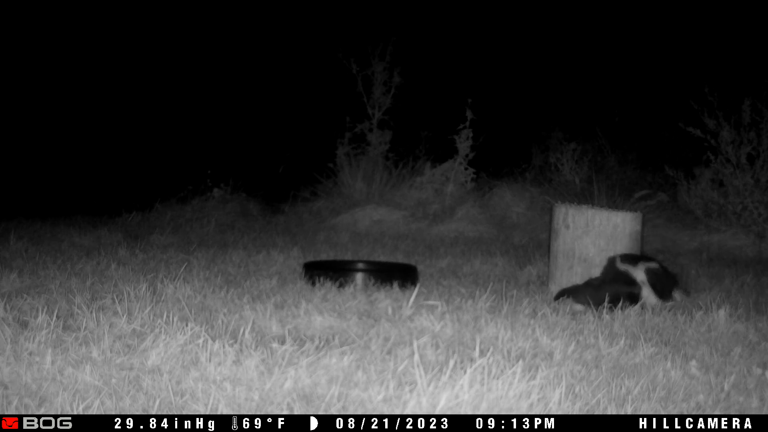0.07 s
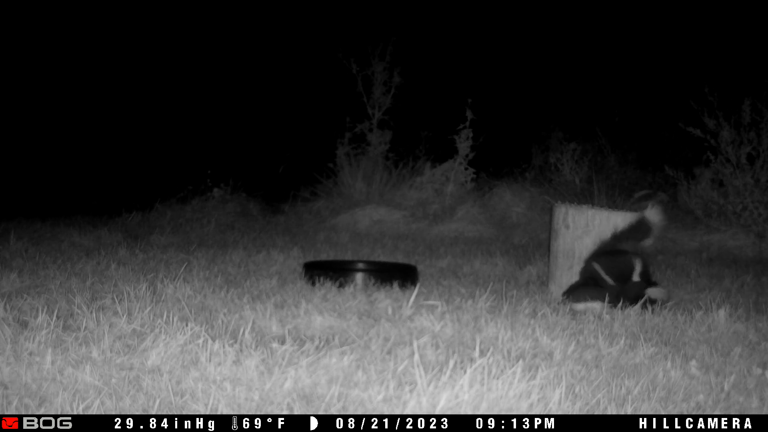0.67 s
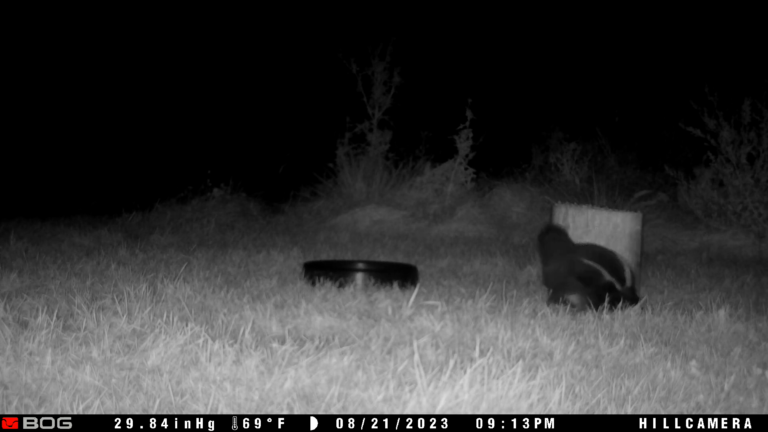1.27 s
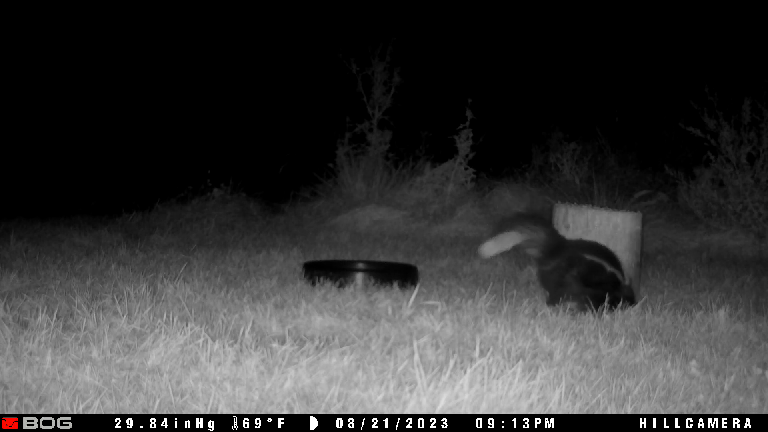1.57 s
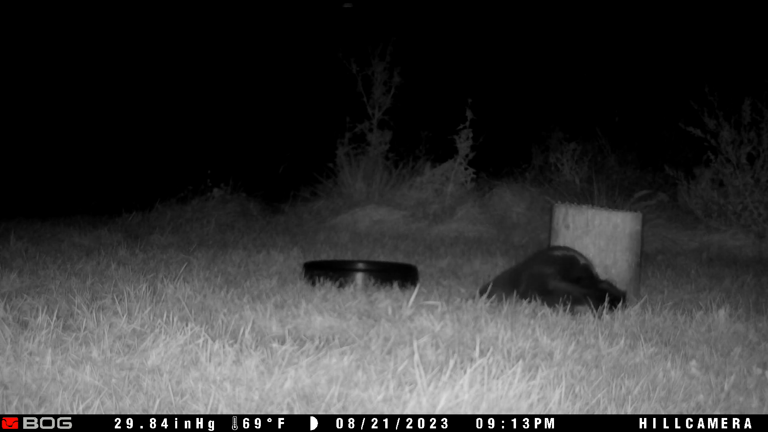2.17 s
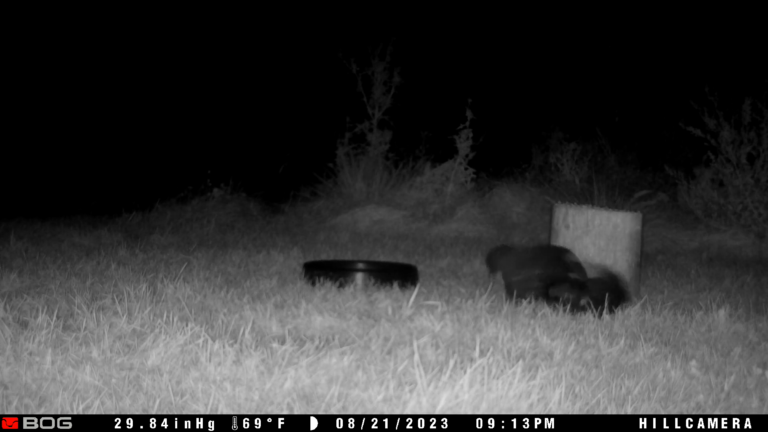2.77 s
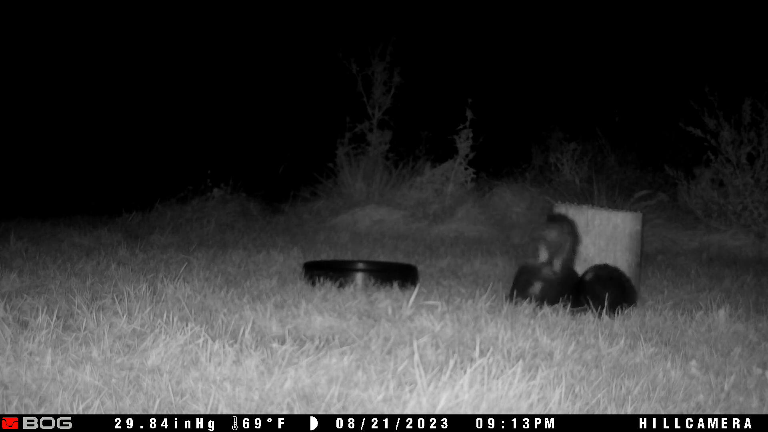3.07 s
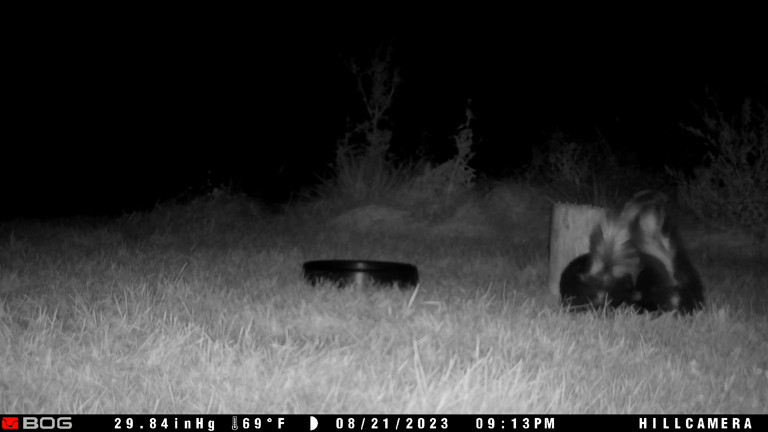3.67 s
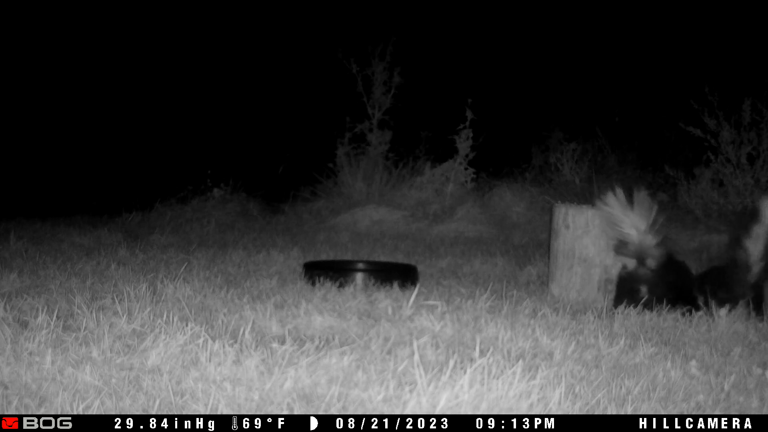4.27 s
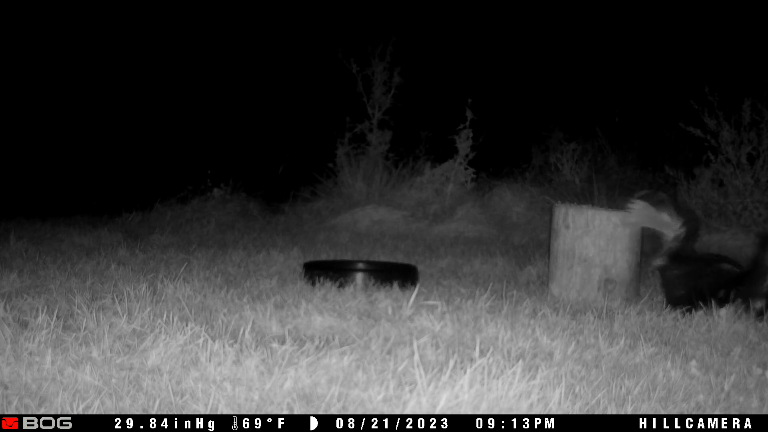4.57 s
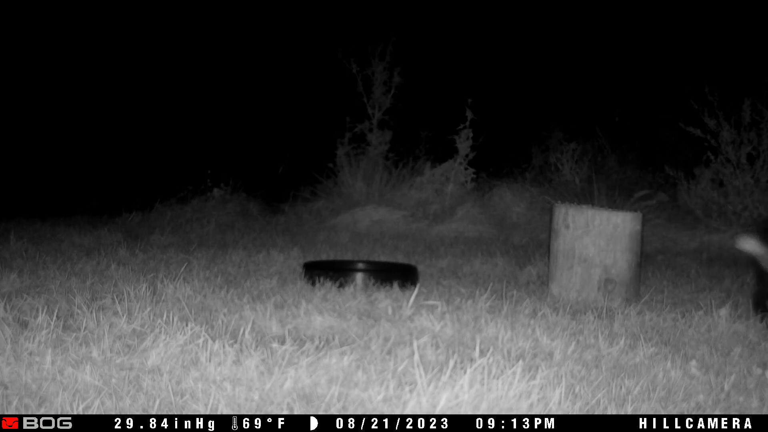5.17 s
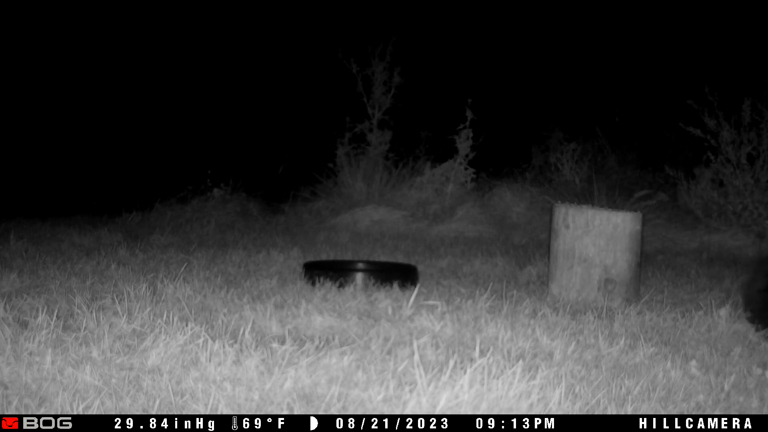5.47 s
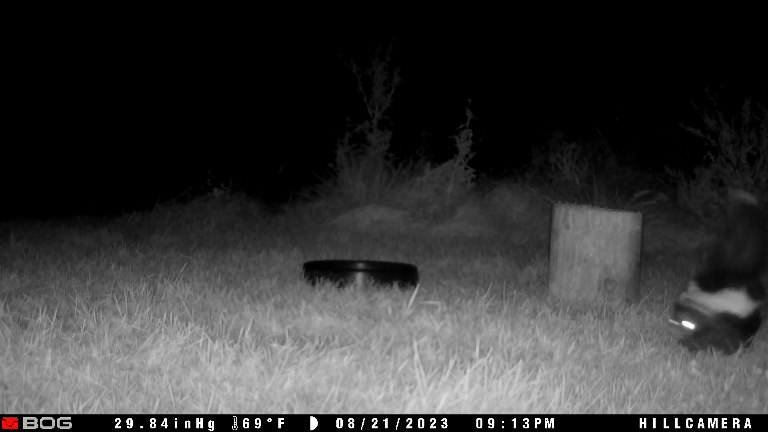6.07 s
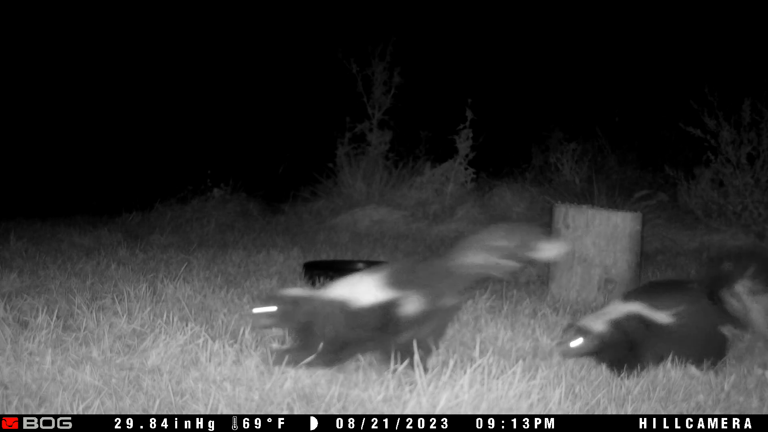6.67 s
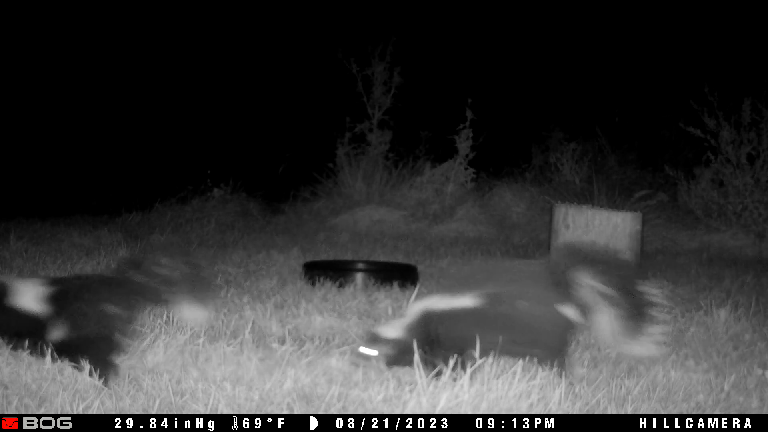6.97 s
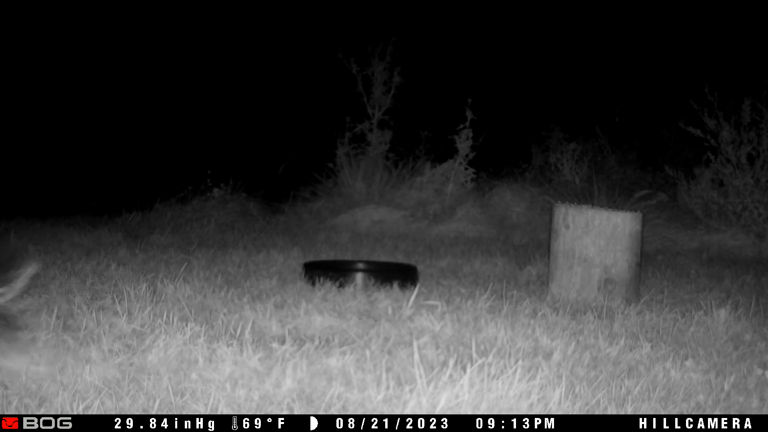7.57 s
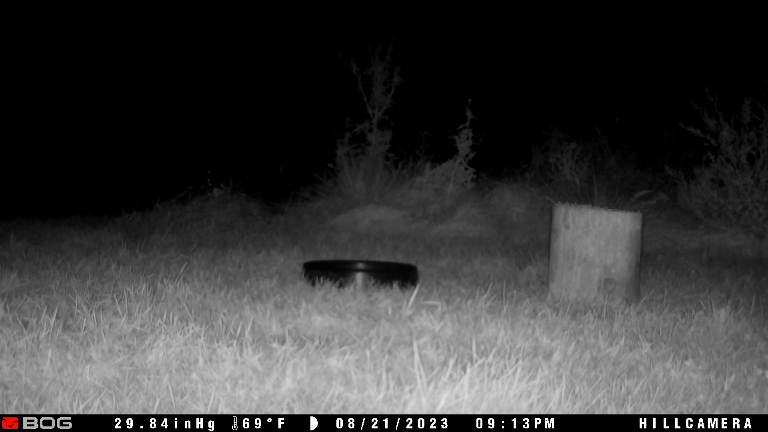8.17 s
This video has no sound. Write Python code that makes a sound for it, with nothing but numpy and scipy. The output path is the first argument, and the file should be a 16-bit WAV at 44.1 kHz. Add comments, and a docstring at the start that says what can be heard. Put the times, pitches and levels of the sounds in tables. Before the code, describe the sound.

High, harsh screeches of fighting skunks crackle a close microphone while night insects chirr, ending with a short scamper through grass.

```python
"""A lawn at night, where two skunks fight a few metres from a small microphone.
One screeches again and again: its tight vocal folds make a high, unsteady whistle with a strong
octave, which keeps breaking into rasp and makes the microphone crackle. Crickets trill all round,
two katydids scrape their wings out of step, and at last the skunks run off through the grass."""
import sys
import numpy as np
from scipy import signal
from scipy.fft import rfft, irfft, next_fast_len
from scipy.io import wavfile
from scipy.ndimage import uniform_filter1d

SR = 44100
rng = np.random.default_rng(int(sys.argv[2]) if len(sys.argv) > 2 else 0)


def store_pcm(level_fs):
    """Save levels as 16-bit WAV."""
    pcm = np.round(np.clip(level_fs, -1, 1) * 32767).astype(np.int16)
    wavfile.write(sys.argv[1], SR, np.atleast_2d(pcm).T)


N = 371322
TIME = np.arange(N) / SR

# tone of the still night air: frequency_hz, gain_db
AIR_EQ = [(25, -20), (100, -16.5), (220, -10), (350, -4), (560, -4.5), (950, 3.5), (1700, -2.5), (2600, 0),
          (3700, -11), (5350, -8), (5900, -23.5), (7400, -38), (12500, -45), (15700, -33)]
# cricket choruses: pitch_hz, spread_hz, pulses_per_s, level_db
CRICKET_CHORUSES = [(2136, 77, 36, -43.5), (2417, 49, 65, -58.5), (2970, 100, 77, -52)]
# strokes at which each katydid shifts its tempo: time_s
HIGH_KATYDID_CUES = [.06, 1.775, 2.41, 3.497, 3.64, 4.667, 6.032, 6.76, 6.906, 7.631, 7.779, 8.51]
LOW_KATYDID_CUES = [.03, 0.364, .953, 1.757, 2.637, 3.844, 4.532, 5.521, 5.994, 7.557, 8.445]
# tone of a wing scrape: frequency_hz, gain_db
WING_EQ = [(7000, -45), (9000, -6), (10500, 2.5), (12200, 9), (13500, 4.5), (15500, 2), (17000, -30)]
# bodies brushing through the grass: start_s, end_s, level_db
SCUFFLES = [(2.6, 2.7, -45.5), (3.42, 3.56, -48), (5.52, 5.62, -43.5), (5.92, 6.08, -48.5)]
# paws snapping stems: start_s, relative_level_db
PAW_STEPS = [(6.418, -36), (6.4726, -37), (6.6456, -36), (6.6647, -30), (6.9631, -41), (7.0994, -47),
             (7.1194, -43), (7.152, -42)]
# tone of the grass: frequency_hz, gain_db
GRASS_EQ = [(60, -32), (500, 7), (2000, 0), (4300, 10.5), (6000, -15), (9000, -39), (15000, -28)]
# echoes from the bushes and the ground: delay_s, gain_db
ECHOES = [(.0043, -70), (0.012, -17), (.029, -52), (.047, -22)]
# tone of the microphone's pops: frequency_hz, gain_db
CRACKLE_EQ = [(20, -0.5), (100, -0.5), (400, 1), (1200, 0), (3000, 0), (5000, -42), (7500, -25),
              (10000, -24), (14000, -13), (16000, -26)]
# air hissing past the teeth: frequency_hz, gain_db
TEETH_EQ = [(4000, -4), (6200, 8), (7200, 5.5), (9000, -1.5), (11500, -2), (15500, -33)]
# broad part of the rasp: frequency_hz, gain_db
THROAT_EQ = [(200, -17), (600, -3), (1500, -5), (2100, -3.5), (3000, 11), (4500, 13.5), (5500, 0),
             (6300, -36.5), (7300, -41), (9000, -12), (11500, -24.5), (15500, -70)]
# share of the harshest rasp that rings in the mouth: pitch_hz, share_0_to_1
MOUTH_SHARE = [(1300, .92), (1700, 0.7), (2200, 0.45), (2450, 0.29), (2850, 0.36)]
# sidebands from the growl, a slower vibration in the voice: offset_in_growl_rates, gain_db
OCTAVE_SIDEBANDS = [(-2, -39.5), (-1, -1.5), (1, -15.5)]
FUNDAMENTAL_SIDEBANDS = [(-1, -18), (1, -7.5)]
# faint high overtones: pitch_multiple, gain_db
OVERTONES = [(3, -34.5), (4, -42), (5, -48)]
# one curve per screech at full voice, from high arching squeals through hoarse cries to a falling
# shriek: time_s, pitch_hz, level_db, octave_over_fundamental_db, roughness_0_to_1
SCREECHES = [
    [(0, 2790, -29.5, -2, 0.6), (.06, 2990, -26, -12, 0.42), (.11, 2890, -30, 4, 0.82),
     (.145, 2892, -24, 1, 0.96), (.2, 2826, -24, -12, 0.42), (.265, 2710, -32, -8, 0.51),
     (.295, 2534, -26, -14, 0.74), (.34, 2485, -24, -2, .95), (.375, 2613, -29.5, -16, 0.41),
     (.42, 2672, -20, -24, 0.02), (.46, 2464, -28, -1, 0.44), (.49, 2310, -26.5, 8, 0.98),
     (.512, 1964, -39, 0, 0.69)],
    [(.55, 2143, -36.5, 14, 0.36), (.575, 2444, -26, -6, 0.41), (.62, 2640, -30.5, -4, 0.96),
     (.655, 2756, -30.5, -6, 0.42), (.73, 2830, -27.5, -56, 0.37), (.85, 2460, -30.5, 10, 0.77),
     (.94, 2312, -31, -18, 0.54), (.998, 1892, -30, 3, 0.6)],
    [(1.246, 2240, -26.5, 0, 0.48), (1.29, 2573, -26, -5, 0.73), (1.325, 2430, -32.5, -6, 0.55),
     (1.385, 2457, -27.5, -30, 0.33)],
    [(1.428, 2370, -26, -21, 0.16), (1.45, 2404, -24, -23, 0.1), (1.5, 2502, -30, -10, 0.34),
     (1.56, 2410, -31, -1, 0.62), (1.63, 2560, -29.5, -12, 0.41), (1.69, 2494, -24, -19, 0.43),
     (1.75, 2284, -27, 1, 0.2), (1.795, 2383, -25, 6, 0.17), (1.815, 2374, -26, 3, .62),
     (1.85, 2283, -27.5, 5, .65), (1.89, 2536, -27, -7.5, 0.44), (1.945, 2342, -24.5, 10.5, 0.52),
     (1.99, 2466, -27, 0, 0.92), (2.035, 2695, -32, -3, 0.52), (2.225, 2363, -41, 4, 0.74)],
    [(2.258, 2215, -39.5, -2, 0.64), (2.39, 2362, -29.7, 9.5, 0.77), (2.46, 2455, -31.5, -6, 0.68),
     (2.52, 2314, -27.5, 9, 0.81), (2.56, 2280, -31.5, 6, 0.56), (2.585, 2244, -22.5, 9.5, .4)],
    [(2.852, 1745, -27.5, 10, 0.87), (2.9, 1860, -26.5, 21, 0.55), (2.95, 2162, -28, 11, 0.85),
     (3.08, 2116, -27.5, -2, 0.63), (3.14, 2155, -27.3, 11, 0.73), (3.25, 1701, -29.5, 6, 0.77),
     (3.3, 1830, -30, 5, 0.68), (3.38, 1628, -30.6, 9, 0.83), (3.44, 1255, -44.5, -16, 0.87)],
    [(3.848, 1856, -28.5, 7, 0.79), (3.885, 2286, -24.5, 6, .85), (3.93, 1957, -24.5, 13, 0.74),
     (4.05, 2004, -28, 4, 0.67), (4.19, 2017, -31.5, 0.5, 0.61), (4.275, 2270, -31.6, 2.5, 0.8),
     (4.33, 2104, -31, 6, 0.9), (4.42, 2200, -28.5, 0, 0.61)],
    [(4.463, 2144, -27.5, 2, 0.81), (4.53, 2213, -22.8, 1.5, 0.62), (4.59, 2236, -30, 0, 0.7),
     (4.66, 2238, -27, 5, 0.55), (4.775, 2130, -28, 2, 0.48), (4.81, 2098, -22, 6, .55),
     (4.84, 2300, -24, 2, 0.84), (4.885, 2608, -21.5, -5, 0.86), (4.93, 2393, -25, 6.5, 0.9),
     (4.99, 2287, -22, 24, 0.56), (5.04, 2130, -18.5, 14, 0.63), (5.09, 2397, -22, 4, 0.7),
     (5.2, 2300, -19, 17.5, 0.63), (5.27, 1935, -16, 17, 0.85), (5.312, 1660, -20, -2, 0.94)],
    [(5.65, 2560, -18.5, -13, 0.96), (5.685, 2175, -18, 17, .35), (5.72, 2257, -21.5, 15, 0.48),
     (5.755, 2158, -20.5, 23, 0.76), (5.765, 1942, -19.5, 13, 0.83), (5.8, 1785, -15, 11.5, 0.45),
     (5.85, 1593, -14.5, 14, 0.59), (5.875, 1276, -24, 3, 0.97), (5.9, 1204, -38.5, -8, 0.9)],
]

ATTACK_S, RELEASE_S, SAG = .034, .028, .42   # SAG: share of the pitch lost as the breath fails
TREMOR_HZ, TREMOR_SHARE, TREMOR_DB = 70.1, .022, 1.5   # rough shake: rate, pitch swing, rasp swing
GROWL_HZ, GROWL_RISE = 497, 2.3   # rate at a pitch of 2200 Hz; power of the pitch by which it quickens
FRAY_POWER = 2.45   # the partials stay clean until the voice is quite rough
THROAT_PEAK_HZ, MOUTH_HZ, MOUTH_WIDTH_HZ = 4410, 3450, 880   # resonances of the rasp


def from_db(db):
    """Decibels to gain."""
    return 10 ** (np.asarray(db) / 20)


def rms_one(x):
    """Scale to an rms of 1."""
    return x / np.sqrt(np.mean(x ** 2) + 1e-20)


def filtered(x, order, hz, kind="low"):
    """Low-, high- or band-pass filter."""
    return signal.sosfilt(signal.butter(order, hz, kind, fs=SR, output="sos"), x)


def equalise(x, eq):
    """Shape the tone with a (Hz, dB) curve."""
    hz, db = np.transpose(eq)
    size = next_fast_len(N + 4096)
    bins = np.maximum(np.arange(size // 2 + 1) * SR / size, 1)
    return irfft(rfft(x, size) * from_db(np.interp(np.log(bins), np.log(hz), db)), size)[:N]


def noise(eq):
    """Coloured noise of rms 1."""
    return rms_one(equalise(rng.standard_normal(N), eq))


def wander(rate_hz):
    """Random modulation up to the given rate, rms 1."""
    return rms_one(filtered(rng.standard_normal(N + SR), 2, rate_hz)[SR:])


def phase_of(hz):
    """Running phase of a moving frequency."""
    return 2 * np.pi * np.cumsum(hz) / SR


def noise_around(phase, width_hz):
    """A band of noise that rides on a moving centre, rms 1."""
    return wander(width_hz) * np.cos(phase) + wander(width_hz) * np.sin(phase)


def night_air(level_db=-48.5):
    """A soft, steady bed of still air."""
    return from_db(level_db) * noise(AIR_EQ)


def crickets(count=7, droop=.041, swell_db=1.5):
    """Each cricket pulses a near-pure tone of its own that drifts, and sags during every wing stroke."""
    out = np.zeros(N)
    for hz, spread_hz, rate, db in CRICKET_CHORUSES:
        chorus, tempo = np.zeros(N), 1 + .07 * wander(8)
        for detune in np.linspace(-1, 1, count):
            stroke = (phase_of(rate * rng.uniform(.85, 1.15) * tempo) / (2 * np.pi) + rng.random()) % 1
            drift_hz = np.interp(TIME, np.linspace(0, TIME[-1], 90), rng.normal(0, 16, 90))
            pitch = hz + detune * spread_hz + drift_hz + hz * droop * (1 - 2 * stroke)
            chorus += np.sin(np.pi * stroke) ** 2 * np.sin(phase_of(pitch)) * from_db(-4 * abs(detune))
        out += from_db(db) * rms_one(chorus) * from_db(swell_db * wander(15))
    return out


def katydid(cues, period_s, size, scrape_s, tick_hz, tick_db, scrape_db=-62, tick_s=.0034):
    """Each wing stroke is a swelling scrape that ends in a short, falling tick."""
    runs = [np.linspace(start, end, max(round((end - start) / period_s), 1), endpoint=False)
            for start, end in zip(cues, cues[1:])]
    strokes = np.concatenate(runs + [cues[-1:]])
    current = np.searchsorted(strokes + period_s / 4, TIME).clip(0, len(strokes) - 1)
    lag = TIME - strokes[current]
    strength = from_db(rng.normal(0, 1, len(strokes)))[current]
    swell = np.interp(lag / scrape_s, [-.85, -.48, -.14], [.14, 1, 1], right=.23)
    tick_phase = phase_of(tick_hz * (1 - 30 * lag.clip(-.005, .005)))
    tick = np.exp(-(lag / tick_s) ** 2) * noise_around(tick_phase, width_hz=600)
    wing = noise([(hz / size, db) for hz, db in WING_EQ])
    return strength * (from_db(scrape_db) * swell * wing + from_db(tick_db) * tick)


def grass(fade_s=.057, snap_decay_s=.0042, snap_trim_db=-8):
    """Stems swish along the bodies and snap under paws."""
    gain = np.zeros(N)
    for start, end, db in SCUFFLES:
        gain[int(start * SR):int(end * SR)] = from_db(db)
    gain = uniform_filter1d(gain, int(fade_s * SR))
    for start, db in PAW_STEPS:
        onset = int(start * SR)
        age = TIME[:N - onset]
        gain[onset:] += from_db(db + snap_trim_db) * np.exp(-np.minimum(age / snap_decay_s, 50))
    return gain * noise(GRASS_EQ)


def yard_echo(x, tail_db=-27, tail_t60_s=.85):
    """The bushes and the ground add a few dull echoes and a short, scattered tail."""
    echoes = sum(from_db(db) * np.interp(TIME - delay, TIME, x, left=0) for delay, db in ECHOES)
    scatter = rng.standard_normal(SR // 2) * from_db(-60 * TIME[:SR // 2] / tail_t60_s)
    tail = signal.fftconvolve(x, scatter / np.linalg.norm(scatter))[:N]
    return x + filtered(echoes + from_db(tail_db) * tail, 2, 6000)


def overload_fizz(voice, ceiling=.35, edge_hz=11000):
    """The loudest shrill peaks overload and leave a thin fizz in the high treble."""
    shrill = filtered(voice, 2, [3800, 5200], "band")
    distorted = np.tanh((shrill / ceiling) ** 3) * ceiling
    return from_db(-2) * filtered(distorted, 6, edge_hz, "high")


def microphone_crackle(voice, threshold_db=-31, gain_db=-10, follow_s=.018, pops_per_s=600):
    """A small microphone pops, the harder the further treble and shrill rasp exceed its limit."""
    pitch, *_, rasp_gain = screech_controls()
    treble = filtered(voice, 4, 3700, "high")
    shrill = from_db(-3) * rasp_gain * (pitch / 2600) ** 5
    level = np.sqrt(np.abs(uniform_filter1d(treble ** 2 + shrill ** 2, int(follow_s * SR))))
    excess = np.maximum(level - from_db(threshold_db), 0)
    pops = (rng.random(N) < pops_per_s / SR) * rng.choice([-1, 1], N)
    strength = from_db(.5 * rng.standard_normal(N).clip(-2, 2))
    return from_db(gain_db) * excess * rms_one(equalise(pops * strength, CRACKLE_EQ))


def screech_controls():
    """Breath swells and dies in each screech; roughness moves power from the partials into the rasp."""
    calls = [np.array(call) for call in SCREECHES]
    breath = np.zeros(N)
    for call in calls:
        start, end = call[0, 0], call[-1, 0]
        breath += np.interp(TIME, [start - ATTACK_S, start, end, end + RELEASE_S], [0, 1, 1, 0])
    breath = breath.clip(0, 1)
    times, *columns = np.concatenate(calls).T
    pitch, level_db, octave_db, roughness = [np.interp(TIME, times, column) for column in columns]
    pitch *= 1 - SAG * (1 - breath) ** 2
    level = breath ** 1.5 * from_db(level_db)
    roughness = roughness.clip(.02, .99)
    root_gain = level * np.sqrt((1 - roughness ** 2) / (1 + from_db(octave_db) ** 2))
    return pitch, roughness, root_gain, root_gain * from_db(octave_db), level * roughness


def partial(phase, fray, width_hz):
    """A pure tone of rms 1 that frays into a noise band as the vibration turns chaotic."""
    return np.sqrt(2 * (1 - fray)) * np.sin(phase) + np.sqrt(fray) * noise_around(phase, width_hz)


def rasp(phase, growl_phase, pitch, roughness, clump_db=3):
    """Clumps of rasp hug the octave and ring in the throat and mouth, over broad throat noise."""
    strands = sum(from_db(db) * partial(2 * phase + step * growl_phase, .13, width_hz=79)
                  for step, db in OCTAVE_SIDEBANDS)
    skirt = from_db(-7.5) * noise_around(1.9 * phase, width_hz=220)
    throat = from_db(-6) * noise_around(2 * np.pi * THROAT_PEAK_HZ * TIME, width_hz=330)
    mouth_band = [MOUTH_HZ - MOUTH_WIDTH_HZ / 2, MOUTH_HZ + MOUTH_WIDTH_HZ / 2]
    mouth = rms_one(filtered(rng.standard_normal(N), 2, mouth_band, "band"))
    mouth_share = (roughness * np.interp(pitch, *np.transpose(MOUTH_SHARE))).clip(0, 1)
    clumps = np.sqrt(1 - mouth_share) * (strands + skirt + throat) * from_db(clump_db * wander(21))
    clumps += np.sqrt(mouth_share) * mouth * from_db(clump_db * wander(40))
    return from_db(-4.17) * clumps + from_db(-5.5) * roughness * noise(THROAT_EQ)


def limit_fold_swing(x, fast_s=.00198, slow_s=.027):
    """The folds swing within limits, so a rough cry varies more in phase than in height."""
    fast, slow = [np.abs(uniform_filter1d(x ** 2, int(s * SR))) + 1e-12 for s in (fast_s, slow_s)]
    return x * (slow / fast) ** (1 / 4)


def skunk(growl_depth=.24, shimmer_db=1, flutter_db=.54, surge_db=3.5):
    """Tight vocal folds whistle, jump and fray; a slower growl splits the partials into strands."""
    pitch, roughness, root_gain, octave_gain, rasp_gain = screech_controls()
    fray = roughness ** FRAY_POWER
    effort = np.sqrt(root_gain ** 2 / 2 + octave_gain ** 2 / 4 + rasp_gain ** 2)

    tremor = np.sin(phase_of(TREMOR_HZ * (1 + .2 * wander(25)))) * roughness * (1 + .5 * wander(6))
    waver = .008 * wander(70)
    jitter = .019 * fray * wander(400)
    jumps = .011 * roughness * np.tanh(4 * wander(20))
    phase = phase_of(pitch * (1 + TREMOR_SHARE * tremor + waver + jitter + jumps))

    growl_hz = GROWL_HZ * np.maximum(pitch / 2200, .9) ** GROWL_RISE
    growl_phase = phase_of(growl_hz * (1 + .1 * wander(18) + .07 * wander(300)))
    growl = 1 + growl_depth * fray * np.sin(growl_phase)
    split = 1 + .91 * roughness * np.sin(growl_phase)   # deeper growl for the overtones

    whistle = root_gain * partial(phase, .49 * fray, width_hz=138)
    whistle *= from_db(.5 + shimmer_db * wander(54))
    for step, db in FUNDAMENTAL_SIDEBANDS:
        sideband = partial(phase + step * growl_phase, np.sqrt(roughness), width_hz=115)
        whistle += from_db(db) * root_gain * np.sqrt(roughness) * sideband
    octave = octave_gain * partial(2 * phase, .8 * fray, width_hz=160)
    whistle += octave * from_db(-.5 + 2.5 * np.sqrt(fray) * wander(80))
    whistle += from_db(-21.5) * effort * split * partial(3 * phase, .7 * roughness, width_hz=200)

    hoarse = rasp_gain * rasp(phase, growl_phase, pitch, roughness)
    hoarse *= from_db(flutter_db * wander(144) + TREMOR_DB * tremor)
    voice = filtered(limit_fold_swing(whistle * growl + hoarse), 10, 6100)
    for multiple, db in OVERTONES:
        gain = from_db(db + surge_db * wander(33)) * effort * (pitch / 2600) ** 2
        voice += gain * split * partial(multiple * phase, .35 * fray, width_hz=82)
    # the higher the squeal, the more air hisses past the teeth
    return voice + from_db(-29.5) * rasp_gain * (pitch / 2300) ** 4.5 * noise(TEETH_EQ)


def scene():
    """The fight up front, over a bed of insects and night air, in mono."""
    voice = yard_echo(skunk())
    katydids = katydid(HIGH_KATYDID_CUES, .123, size=.96, scrape_s=.035, tick_hz=13000, tick_db=-58)
    katydids += katydid(LOW_KATYDID_CUES, .113, size=1.03, scrape_s=.042, tick_hz=11700, tick_db=-61)
    air = night_air()
    fight = voice + overload_fizz(voice) + microphone_crackle(voice) + grass()
    return (air + crickets() + katydids + fight)[None]


def record(dry, ceiling=.37, cutoff_hz=15750):
    """Soft clipping rounds the peaks and a steep low-pass cuts the top."""
    rounded = dry / (1 + (dry / ceiling) ** 4) ** (1 / 4)
    return signal.sosfilt(signal.ellip(12, .1, 80, cutoff_hz, fs=SR, output="sos"), rounded)


dry = scene()
out = record(dry)
store_pcm(out)
```